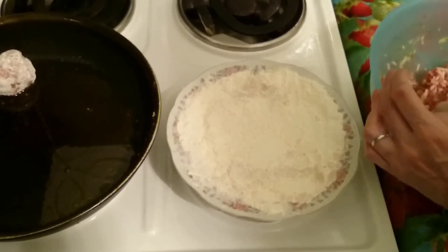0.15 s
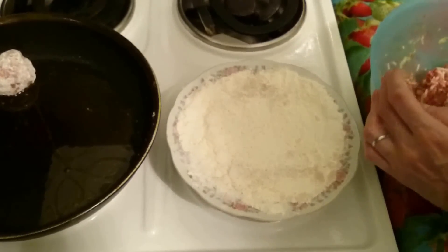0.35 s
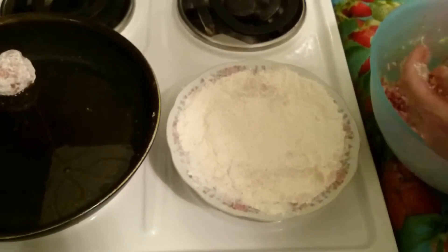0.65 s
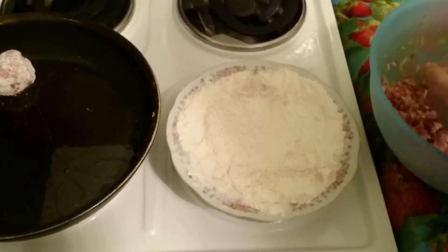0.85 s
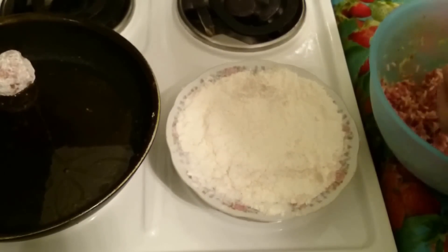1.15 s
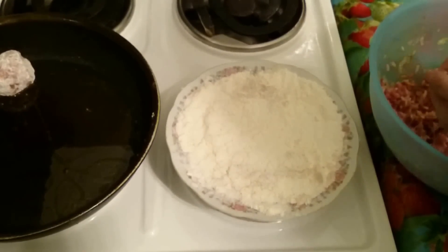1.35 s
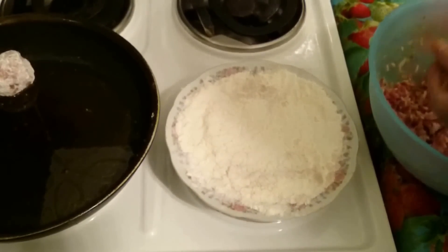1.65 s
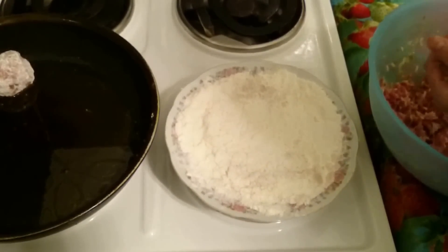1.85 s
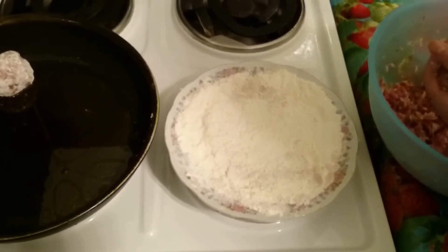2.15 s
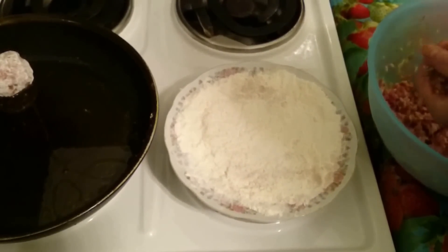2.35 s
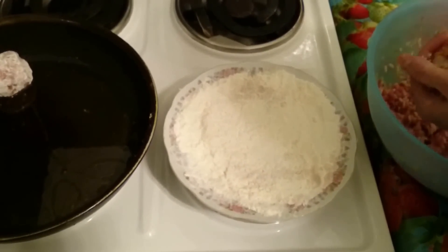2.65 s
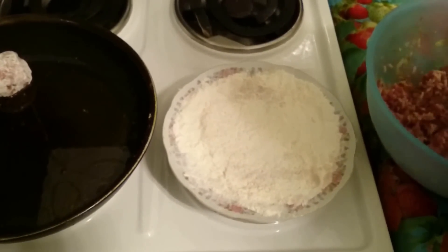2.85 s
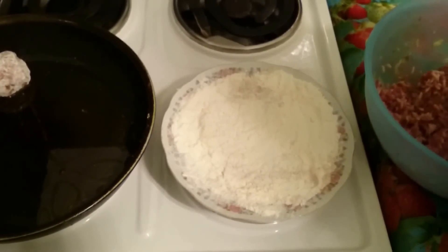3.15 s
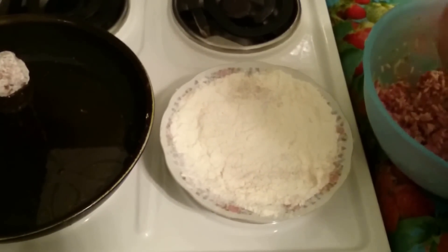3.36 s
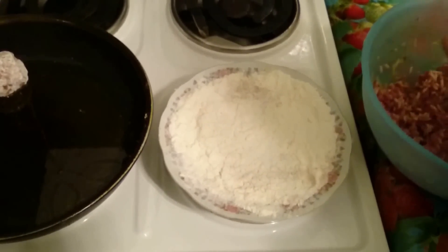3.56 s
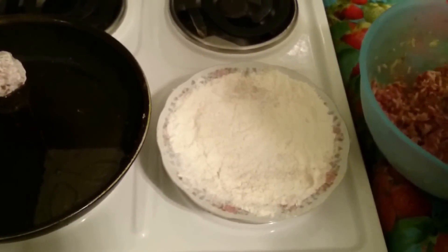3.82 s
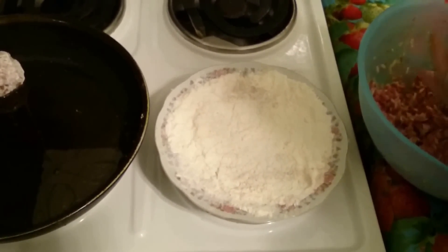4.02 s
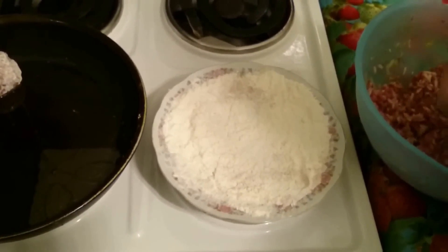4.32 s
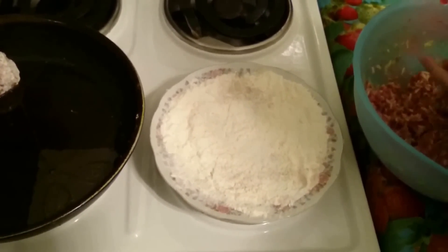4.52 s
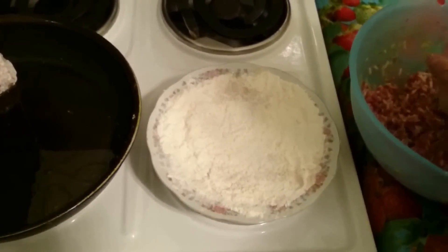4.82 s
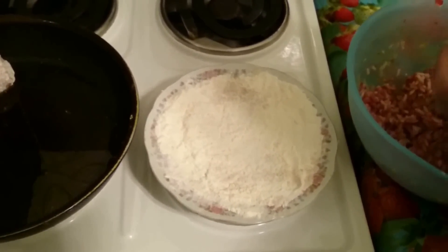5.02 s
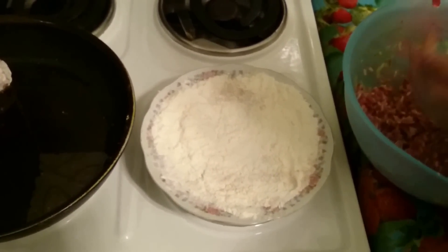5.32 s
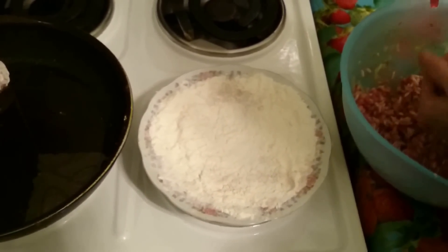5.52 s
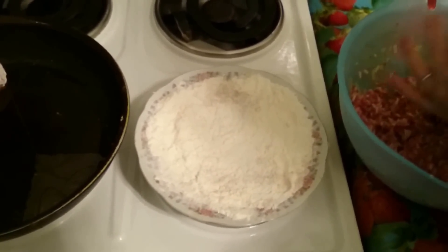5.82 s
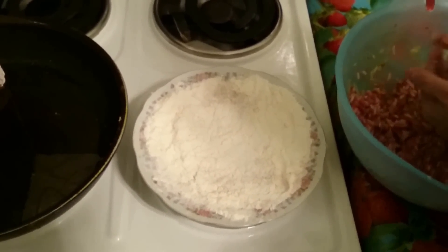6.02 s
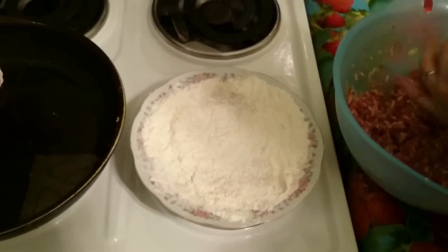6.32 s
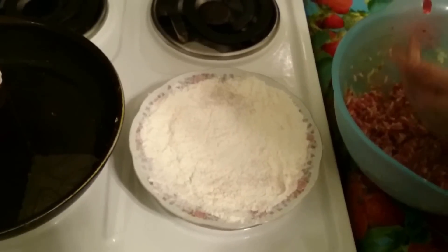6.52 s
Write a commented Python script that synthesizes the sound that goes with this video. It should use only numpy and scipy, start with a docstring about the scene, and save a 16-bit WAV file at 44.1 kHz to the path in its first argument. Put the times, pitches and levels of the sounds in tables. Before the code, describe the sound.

Close by, hands squeeze wet mince: a dense half-second burst of dull squelches and loud smacks, then sparser sticky pulls, crisp wet ticks and small air squirts, becoming more regular toward the end. A tap drips into a sink about once a second across a small kitchen. The handheld microphone rumbles and bumps, mainly on the right, over faint fridge hum and hiss.

```python
"""Wet mince and rice are shaped by hand over a plastic bowl in a small kitchen, the microphone held by hand.
Dull presses open the scene: swarms of bursting air pockets, with louder smacks where meat peels off the skin.
From about one second come bright sticky pulls and squirts of air, and a tap across the room starts to drip.
After three and a half seconds the fingers rustle more and the pulls settle to about three a second.
Throughout, the grip rumbles and at times bumps, mostly on the right, over fridge hum and soft hiss."""
import sys
import numpy as np
from scipy import signal
from scipy.fft import rfft, irfft, next_fast_len
from scipy.io import wavfile

SR = 44100
rng = np.random.default_rng(int(sys.argv[2]) if len(sys.argv) > 2 else 0)


def int16_out(signal):
    """Quantize to a 16-bit WAV file."""
    q = np.round(np.clip(np.atleast_2d(signal).T, -1, 1) * 32767)
    wavfile.write(sys.argv[1], SR, q.astype(np.int16))


N = 294588
TIME = np.arange(N) / SR

# palms press the ball:
# (time of strongest pressure [s], length [s], level before trim [dB], pitch [Hz], large pockets [dB rel.])
PRESSES = [(0.04, 0.23, -36, 5200, -7.5), (0.188, 0.18, -32.5, 5200, -7), (0.266, .17, -31.5, 4830, -6),
           (0.377, .13, -34, 5700, -8), (.456, .07, -28.5, 5430, -8), (1.445, .085, -36.5, 5400, -9),
           (2.365, .074, -38.5, 5340, -11), (3.74, 0.063, -43, 5490, -13), (6.222, 0.24, -50.5, 5500, -5.5)]
PRESS_SWELL_SHARE, PRESS_FILM_DB = .33, -17.5   # builds fast, lets go slowly, sounds dull
# the sticky ball pulls off a palm:
# (time of strongest pull [s], length [s], level before trim [dB], tearing film [dB rel.])
STICKY_PULLS = [(0.95, 0.19, -46.5, -3), (1.407, 0.042, -43.5, -5), (1.531, 0.1, -44.5, -9),
                (2.224, 0.2, -45.5, -4), (2.563, 0.048, -44, -3.5), (2.693, 0.028, -45.5, -2),
                (2.995, 0.058, -51.5, -0.5), (3.169, 0.085, -58.5, 4), (3.519, 0.17, -51, -2),
                (3.624, 0.035, -41.5, 0), (3.911, 0.12, -49, 1.5), (4.081, 0.056, -53.5, -4),
                (4.228, 0.14, -48, 1), (4.573, 0.13, -43, -1), (4.879, .09, -44.5, 0),
                (5.189, .1, -43.5, -0.5), (5.489, 0.1, -42.5, -4.5), (5.809, 0.18, -49, 0.5),
                (6.077, 0.099, -41, -3), (6.384, 0.046, -44.5, 1), (6.652, 0.125, -42, -0.5)]
PULL_SWELL_SHARE, PULL_HZ, PULL_LARGE_DB = .5, 6270, -11   # swells and fades evenly, bright
# trapped air squirts between the fingers: (time [s], level before trim [dB], starting pitch [Hz])
AIR_SQUIRTS = [(1.07, -39, 5760), (1.075, -39, 3700), (1.964, -44.5, 5300), (1.99, -50, 4100),
               (2.327, -42, 4730), (2.342, -38, 4650), (3.632, -47, 2180), (4.002, -44.5, 5000),
               (4.393, -44, 3950), (4.484, -45.5, 2550), (4.813, -41, 4860), (5.496, -43.5, 3620),
               (6.17, -45.5, 1890)]
SQUIRT_ATTACK_S, SQUIRT_T60_S, SQUIRT_SAG_OCTAVES_PER_S = .004, 0.073, 11.3
# fingers sliding on the wet meat: (time [s], level [dB])
FINGER_RUSTLE = [(3.3, -76), (3.5, -65), (4.7, -62.5), (5.9, -64)]
# loudest single smacks: (time [s], level before trim [dB], pitch [Hz], snap of the film [dB rel.])
LOUD_SMACKS = [(0.0134, -19, 5760, -5), (.139, -24, 5900, -5), (.261, -23, 5000, -16),
               (0.312, -17.5, 5940, -12), (0.4526, -15, 5400, -2), (0.477, -21, 5700, -18),
               (0.706, -35.5, 6500, 1.5), (0.7757, -36, 6400, -12), (.935, -30, 5930, -10),
               (0.985, -30, 5950, 22), (1.403, -32, 6300, 4), (1.556, -26, 5200, 11),
               (2.1382, -30.5, 4860, -4), (2.3402, -22, 5300, -14), (2.3526, -20.5, 5990, -2),
               (2.358, -17, 6270, -1), (2.371, -18, 5900, 2), (2.384, -22, 5700, -14),
               (2.529, -32, 5670, 22), (2.547, -24, 5200, -13), (2.558, -36, 6050, -10),
               (2.659, -21.5, 7460, 19), (2.815, -30, 4580, 17), (2.8913, -33.5, 6430, 5),
               (3.048, -31.5, 5260, 5.5), (3.1363, -33, 5980, 10), (3.4133, -32.5, 6400, -12),
               (3.454, -27.5, 6600, 2.5), (3.5523, -22.5, 6200, 3.5), (3.62, -25, 5500, 6),
               (3.714, -27, 5480, 11), (3.9996, -25, 5330, -7), (4.229, -26, 5260, 0),
               (4.237, -28, 5520, -9), (4.8532, -22.5, 5700, -5), (4.8735, -28, 5900, -10),
               (4.877, -23, 5740, -12), (4.885, -21.5, 5470, -13), (4.897, -26, 5500, -5),
               (4.902, -13, 5300, -12), (4.9841, -30, 5400, 16), (5.1711, -25, 6270, -2),
               (5.432, -28, 5900, 10), (5.4955, -18, 5440, -11), (5.5094, -23.5, 5370, 5),
               (5.681, -27, 6400, 3), (5.924, -29.5, 5560, -12), (5.9872, -31.5, 5900, -3),
               (6.028, -27.5, 6360, 6), (6.088, -33.5, 5570, -13), (6.1029, -20, 6050, -2),
               (6.3743, -23, 6500, 9), (6.576, -29, 5700, -4), (6.635, -23, 7200, 4),
               (6.6572, -27, 5800, -2), (6.675, -23.5, 5800, -4)]
# small ticks: count, level and film snap
POPS_PER_S, POP_OVER_PRESS_DB, POP_SNAP_DB = 70, 6, -9.5   # single pockets during a press
TICKS_PER_PULL, TICK_OVER_PULL_DB, TICK_SNAP_DB = 5, 8, -12   # small smacks around each pull
STRAY_TICKS_PER_S, STRAY_TICK_DB, STRAY_SNAP_DB = 3.6, -39, 3   # thin film snaps at any time
TICK_HZ = 5330

# microphone colour: (frequency [Hz], gain [dB])
MIC_COLOUR = [(200, 15), (1500, -7.5), (3500, -2), (4600, -3.5), (5700, 1), (6600, -3.5), (8000, -5.5),
              (10000, -1.5), (11700, -6), (13500, -2.5), (16000, -8.5)]
# treble tilt between the ears, scaled for each ear in scene(): (frequency [Hz], tilt [dB])
EAR_TILT = [(3000, -0.5), (5500, -0.5), (7000, 4.5), (9000, 9), (12000, 7.5), (14500, 0)]
LEFT_LAG_S, RIGHT_LAG_S = .00014, 0
# colour of the room sound: (frequency [Hz], gain [dB])
WALL_COLOUR = [(2000, 6), (5500, 0.5), (8000, -0.5), (16000, 4.5)]
ROOM_T60_S, HAND_MOVE_S = 0.4, .06   # room decay; interval at which the close reflections change

# drops hitting the sink: (time [s], level before trim [dB])
TAP_DRIPS = [(1.173, -34.5), (2.186, -35), (3.363, -33.5), (4.203, -34), (5.289, -33), (6.404, -32)]
# spectrum shape of the splash: (frequency [Hz], level [dB rel.])
SPLASH_COLOUR = [(300, -5.5), (600, -1.5), (900, -1), (1300, -6), (2000, 1.5), (3500, 0), (5800, 5),
                 (7500, -8), (16000, -23)]
# ringing of the sink: (frequency [Hz], width [Hz], level [dB rel. splash])
SINK_MODES = [(1633, 11, -18.5), (2624, 18, -23), (3050, 40, -15), (3490, 85, -18.5), (4470, 39, -16)]
# air in the sink: (frequency [Hz], width [Hz], level [dB rel. splash])
HOLLOW_MODES = [(577, 180, -15), (726, 110, -13), (894, 25, -14)]
# floor of the sink: (frequency [Hz], width [Hz], level [dB rel. splash])
SINK_FLOOR_MODES = [(141, 9, -13), (226, 5.8, -14.5)]

# fingers bumping the microphone: (time [s], level [dB], pitch [Hz], ring of the case [dB rel.])
MIC_BUMPS = [(.481, -22.5, 287, -7), (0.582, -16.5, 67.5, -26), (3.512, -17.5, 283, 1),
             (3.517, -25, 110, -22), (5.2859, -18, 336, -2), (5.2858, -22, 141, -3), (5.498, -21.5, 148, 0),
             (5.553, -24.5, 142, -1), (5.731, -16, 201, -30), (5.957, -28.5, 160, 6.5),
             (6.661, -25, 197, 5.5)]
# rumble of the grip: (frequency [Hz], level per Hz before trim and surges [dB])
GRIP_RUMBLE = [(3, -31), (12, -32.5), (24, -42), (45, -56), (90, -64.5), (160, -68.5), (300, -77.5),
               (600, -91), (2000, -120)]
# the holding hand steadies: (time [s], drop of tremor and rumble [dB])
STEADY_MOMENTS = [(1.87, 13), (4.0, 14), (4.716, 25), (5.65, 11), (6.32, 12.5), (6.62, 11)]
STEADY_S = 0.12   # time from the middle of a steady moment until its drop is down to 1/e
SURGE_PER_S, SURGE_DB = 3.26, 1   # chance surges of the grip: pace and spread

# still kitchen and microphone hiss: (frequency [Hz], level per Hz [dB])
STILL_KITCHEN = [(20, -65), (100, -68), (170, -72.5), (300, -77.5), (500, -82), (1100, -89.5), (2200, -93),
                 (4000, -95.5), (5800, -95.5), (8000, -100.3), (11500, -102), (14000, -100), (16000, -101)]
# fridge hum: (frequency [Hz], level [dB rms])
FRIDGE_TONES = [(148, -55), (228, -60.5)]
CUTOFF_HZ = 16000


def mince(press_db=-10.0, pull_db=-9.0, squirt_db=25.0, sticky_per_s=900):
    """Presses and pulls are swarms of bursting pockets, with air squirts; fingers rustle on the wet meat."""
    rustle_level = from_db(np.interp(TIME, *np.transpose(FINGER_RUSTLE)))
    sticky_bursts = burst_train(np.full(N, sticky_per_s))
    out = rustle_level * pockets(sticky_bursts, pitch_hz=6000.0, large_db=-8, film_db=-2.5)

    def add_squelch(s, length, swell_share, level_db, trim_db, pitch_hz, large_db, film_db):
        """One swarm, strongest at time s; any part before time zero is left out."""
        swell = length * swell_share
        bursts = pressed_bursts(max(swell, .002), max(length - swell, .01), level_db)
        early = max(round((swell - s) * SR), 0)
        swarm = pockets(bursts, pitch_hz, large_db, film_db)[early:]
        add(out, s - swell, from_db(level_db + trim_db) * swarm)

    for s, length, level_db, pitch_hz, large_db in PRESSES:
        add_squelch(s, length, PRESS_SWELL_SHARE, level_db, press_db, pitch_hz, large_db, PRESS_FILM_DB)
    for s, length, level_db, film_db in STICKY_PULLS:
        add_squelch(s, length, PULL_SWELL_SHARE, level_db, pull_db, PULL_HZ, PULL_LARGE_DB, film_db)
    for s, level_db, pitch_hz in AIR_SQUIRTS:
        add(out, s - SQUIRT_ATTACK_S, from_db(level_db + squirt_db) * squirt(pitch_hz))
    return out


def pressed_bursts(swell, release, level_db, per_s=900, edge_db=-12):
    """Pockets burst faster and harder as pressure rises; a firm squeeze is denser than a light one."""
    t = TIME[:int((swell + release) * SR)]
    from_peak = np.interp(t, [0, swell, swell + release], [1, 0, 1])   # 0 at strongest, 1 at the edges
    pressure = from_db(edge_db * from_peak ** 1.2)
    firmness = from_db((level_db + 42) / 3)
    return burst_train(per_s * firmness * np.sqrt(pressure)) * pressure


def burst_train(per_s, spread_db=4.0):
    """Bursts come at random, many small and a few large."""
    size = np.minimum(rng.exponential(1, len(per_s)), 4)
    happens = rng.random(len(per_s)) < per_s / SR
    return happens * from_db(spread_db * size)


def pockets(bursts, pitch_hz, large_db, film_db, octaves=0.26, q=3.3, uneven_db=4.0):
    """Each burst rings a random mix of pocket sizes: a peak at its pitch, large pockets below, film above."""
    hz = np.geomspace(400, 15000, num=26) * 2 ** rng.uniform(-.07, .07, 26)
    main = 1 / (1 + (np.log2(hz / pitch_hz) / octaves) ** 2) ** 1.5
    large = from_db(large_db - 4.0) * np.exp(-(np.log2(hz / 2500) / 1.21) ** 2)
    film = from_db(film_db - 2.0) / (1 + (8500 / hz) ** 4)
    shares = np.sqrt(main ** 2 + large ** 2 + film ** 2)
    at = np.flatnonzero(bursts)
    out = np.zeros(len(bursts))
    for centre, share in zip(hz, shares):
        sign = rng.choice([-1, 0, 0, 1], len(at))   # half of the bursts skip this band
        clicks = np.zeros(len(bursts))
        clicks[at] = bursts[at] * sign * from_db(uneven_db * rng.standard_normal(len(at)))
        out += share * unit_energy(resonate(clicks, centre, q))
    return out * np.sqrt(len(out))


def squirt(pitch_hz, q=1.5, bursts_per_s=2500):
    """Air sputters through a wet gap; the gap's resonance sinks as it opens."""
    t = TIME[:SR // 10]
    flow = np.minimum(t / SQUIRT_ATTACK_S, 1) * from_db(-60 * t / SQUIRT_T60_S)
    gap_hz = pitch_hz * 2 ** (-SQUIRT_SAG_OCTAVES_PER_S * t)
    turn = np.exp(2j * np.pi * np.cumsum(gap_hz) / SR)
    r = np.exp(-np.pi * pitch_hz / q / SR)
    sputter = burst_train(np.full(len(t), bursts_per_s)) * rng.choice([-1, 1], len(t)) * flow
    # shift the moving pitch to zero, smooth there, and shift back
    smoothed = signal.lfilter([1], [1, -2 * r, r * r], sputter / turn)
    return unit_energy((smoothed * turn).real)


def peeling(smack_db=14.5, scatter=.22, uneven_db=2.5, octaves=0.21):
    """Meat lets go of the skin in smacks; smaller ticks cluster at pulls and presses and stray in between."""
    out = np.zeros(N)
    for s, level_db, pitch_hz, snap_db in LOUD_SMACKS:
        add(out, s, smack(level_db + smack_db, pitch_hz, snap_db))
    ticks = []
    for s, length, level_db, _ in STICKY_PULLS:
        for _ in range(TICKS_PER_PULL):
            at = s + scatter * length * rng.standard_normal()
            ticks.append((at, level_db + TICK_OVER_PULL_DB, TICK_SNAP_DB))
    for s, length, level_db, *_ in PRESSES:
        for _ in range(round(POPS_PER_S * length)):
            at = abs(s + length * rng.uniform(-PRESS_SWELL_SHARE, 0.54))
            ticks.append((at, level_db + POP_OVER_PRESS_DB, POP_SNAP_DB))
    for at in np.cumsum(rng.exponential(1 / STRAY_TICKS_PER_S, size=50)):
        ticks.append((at, STRAY_TICK_DB, STRAY_SNAP_DB))
    chances = rng.standard_normal((len(ticks), 2))
    for (s, level_db, snap_db), (strength, size) in zip(ticks, chances):
        pitch_hz = TICK_HZ * 2 ** (octaves * size)
        add(out, s, smack(level_db + smack_db + uneven_db * strength, pitch_hz, snap_db))
    return out


def smack(level_db, pitch_hz, snap_db, tear_s=0.0043, film_low_hz=7000, q=2.03, crack_db=-21.0):
    """A wet film tears with a broad crack, higher when it snaps hard; the pocket behind rings a few cycles."""
    tear = dying_noise(tear_s, .01)
    film_hz = film_low_hz * (1 + np.clip(snap_db / 40, 0, .6))
    high_pass = signal.butter(2, film_hz, "high", fs=SR, output="sos")
    film = signal.sosfilt(high_pass, tear + .5 * signal.unit_impulse(len(tear)))
    pocket = resonate(resonate(tear, pitch_hz, q), pitch_hz, q)
    crack = resonate(tear, pitch_hz / 2, 1)
    mix = unit_energy(pocket) + from_db(snap_db) * unit_energy(film)
    mix += from_db(crack_db) * unit_energy(crack)
    return from_db(level_db) * unit_energy(mix)


def kitchen(x, lag_s, near_db, room_db, near_t60=0.042, gap_s=0.00093):
    """One ear: direct sound, quick bowl and hob reflections that change as the hands move, then the room."""
    room = from_db(room_db) * colour(dying_noise(ROOM_T60_S, .5), WALL_COLOUR)
    room *= np.minimum(TIME[:len(room)] / gap_s, 1)
    out = np.zeros(N)
    step = int(HAND_MOVE_S * SR)
    for start in range(0, N, step):
        response = from_db(near_db) * dying_noise(near_t60, .5) + room
        response[round(lag_s * SR)] += 1   # direct sound
        add(out, start / SR, signal.fftconvolve(x[start:start + step], response))
    return out


def tap(level_db=28.0, basin_t60=0.09, room_db=0.5, rise_s=0.003, change=1.0,
        hollow_rise_s=0.017, hollow_t60=0.51):
    """Each drop splashes a little differently; the sink rings, its hollow and floor swell after and linger."""
    def echoes():
        return dying_noise(basin_t60, .5) + from_db(room_db) * dying_noise(ROOM_T60_S, .5)

    usual = echoes()   # shared by all drops
    out = np.zeros(N)
    t = TIME[:len(usual)]
    for s, drip_db in TAP_DRIPS:
        splash = usual + change * echoes()
        air = dying_noise(hollow_t60, .5) * np.minimum(t / hollow_rise_s, 1)
        drop = unit_energy(colour(splash, SPLASH_COLOUR))
        drop += ringing(splash, SINK_MODES) + ringing(air, HOLLOW_MODES + SINK_FLOOR_MODES)
        add(out, s, from_db(drip_db + level_db) * drop * np.minimum(t / rise_s, 1))
    return out


def ringing(x, modes):
    """A body of resonances driven by x."""
    return sum(from_db(db) * unit_energy(resonate(x, hz, hz / width)) for hz, width, db in modes)


def handling(tremor_hz=6.8, tremor_db=-12.5, rumble_db=0.4, cycles=0.45, bump_db=0.0,
             case_hz=106, case_t60=0.07):
    """The grip trembles and rumbles, less when steadied; a bump is a soft push that leaves the case ringing."""
    rate = tremor_hz * from_db(1.893 * wander(11.0))
    tremor = from_db(tremor_db) * np.sin(2 * np.pi * np.cumsum(rate) / SR)
    rumble = from_db(rumble_db) * noise(GRIP_RUMBLE)
    calm_db = sum(drop_db * np.exp(-((TIME - s) / STEADY_S) ** 2) for s, drop_db in STEADY_MOMENTS)
    out = (tremor + rumble) * from_db(SURGE_DB * wander(SURGE_PER_S) - calm_db)
    t = np.arange(-SR // 40, SR // 10) / SR   # zero at the middle of the push
    after = np.maximum(t, 0)
    for s, level_db, hz, case_db in MIC_BUMPS:
        push = np.cos(2 * np.pi * hz * t) * np.exp(-(hz * t / cycles) ** 2)
        case = np.sin(2 * np.pi * case_hz * after) * from_db(case_db - 60 * after / case_t60)
        add(out, s + t[0], from_db(level_db + bump_db) * (case - push))
    return out


def wander(per_s):
    """Slow chance: straight lines between random points with a spread of one, per_s points a second."""
    knots = rng.standard_normal(200)
    return np.interp(TIME * per_s, np.arange(len(knots)), knots)


def fridge(width_hz=5.25):
    """Two wavering hum tones, each noise passed twice through a narrow resonance."""
    out = np.zeros(N)
    for hz, db in FRIDGE_TONES:
        once = resonate(rng.standard_normal(N + SR), hz, hz / width_hz)
        tone = resonate(once, hz, hz / width_hz)[SR:]   # skip the build-up
        out += from_db(db) * np.sqrt(N) * unit_energy(tone)
    return out


def noise(points):
    """Steady noise with the given dB per Hz."""
    return colour(rng.standard_normal(N + SR), points)[SR:] * np.sqrt(SR / 2)


def dying_noise(t60, length_s):
    """Dense echoes that fall 60 dB in t60 seconds, scaled to unit energy."""
    t = TIME[:int(length_s * SR)]
    return unit_energy(rng.standard_normal(len(t)) * from_db(-60 * t / t60))


def resonate(x, hz, q):
    """Band-pass resonance with gain one at its top."""
    b, a = signal.iirpeak(min(hz, .45 * SR), max(q, 1), fs=SR)
    return signal.lfilter(b, a, x + 1e-18)


def colour(x, points):
    """Causal (minimum-phase) filter that follows (frequency [Hz], gain [dB]) points."""
    size = next_fast_len(x.shape[-1] + SR // 4, True) // 2 * 2
    hz, db = np.transpose(points)
    bins_hz = np.arange(size // 2 + 1) * SR / size
    curve = np.interp(np.log(bins_hz + 1e-3), np.log(hz), db)
    # fold the cepstrum onto positive time for minimum phase
    cepstrum = irfft(np.log(from_db(curve)))
    cepstrum[1:size // 2] *= 2
    cepstrum[size // 2 + 1:] = 0
    response = np.exp(rfft(cepstrum))
    return irfft(rfft(x, size) * response)[..., :x.shape[-1]]


def from_db(db):
    """Decibels to gain."""
    return 10 ** (np.asarray(db) / 20)


def unit_energy(x):
    """Scale so that the squares sum to one."""
    return x / np.sqrt(np.sum(x ** 2, axis=-1, keepdims=True) + 1e-20)


def add(out, s, sound):
    """Mix a sound in at time s."""
    start = int(np.clip(round(s * SR), 0, N))
    out[start:start + len(sound)] += sound[:N - start]


def scene(leak_db=-32.0):
    """Hands, tap and background at the two microphone ports; the bowl stands to the right."""
    wet = colour(np.array([mince(), peeling()]), MIC_COLOUR)
    held = handling()
    hum = fridge()
    left = (0.45, LEFT_LAG_S, from_db(leak_db))   # (tilt factor, lag [s], handling gain)
    right = (-1.03, RIGHT_LAG_S, 0.99)
    ears = []
    for tilt, lag_s, held_gain in (left, right):
        squelches, smacks = colour(wet, [(hz, tilt * db / 2) for hz, db in EAR_TILT])
        # squelches inside the closed hands arrive mostly by reflection, smacks straight from the open palm
        hands = kitchen(squelches, lag_s, near_db=4.0, room_db=-1.0)
        hands += kitchen(smacks, lag_s, near_db=-2.5, room_db=-8.0)
        ears.append(hands + tap() + noise(STILL_KITCHEN) + hum + held_gain * held)
    return np.array(ears)


def record(dry):
    """An elliptic low-pass cuts the top steeply."""
    low_pass = signal.ellip(10, .2, 80, CUTOFF_HZ, fs=SR, output="sos")
    return signal.sosfilt(low_pass, dry)


dry = scene()
out = record(dry)
int16_out(out)
```